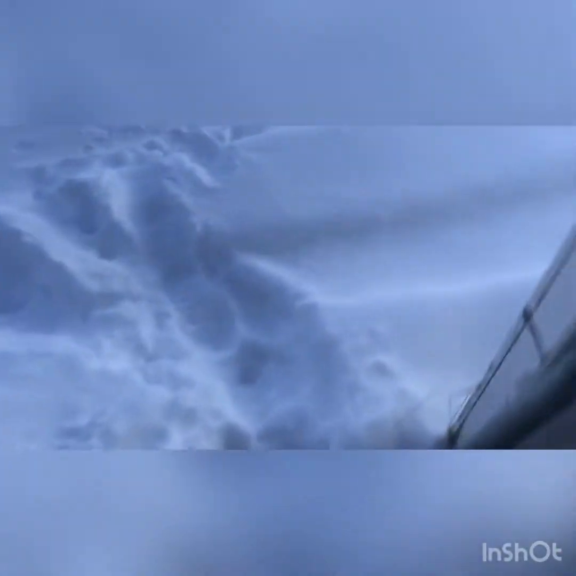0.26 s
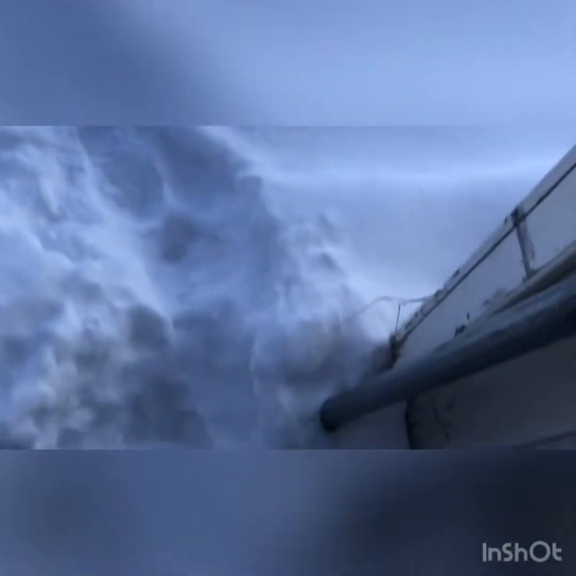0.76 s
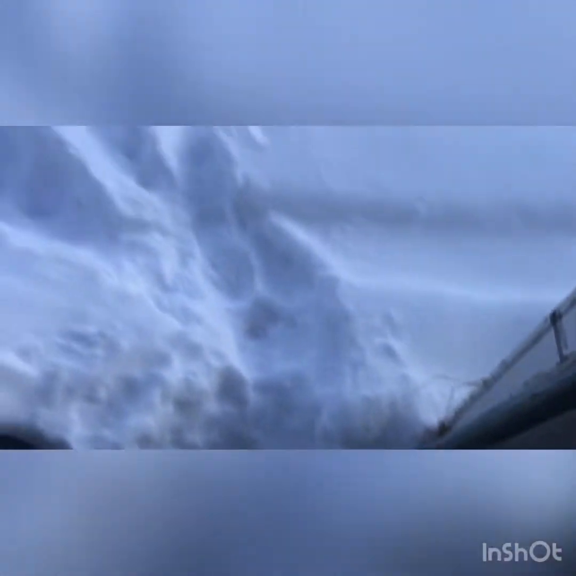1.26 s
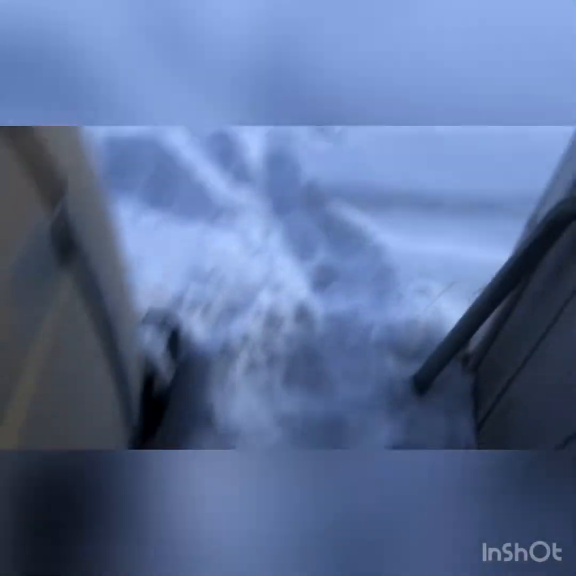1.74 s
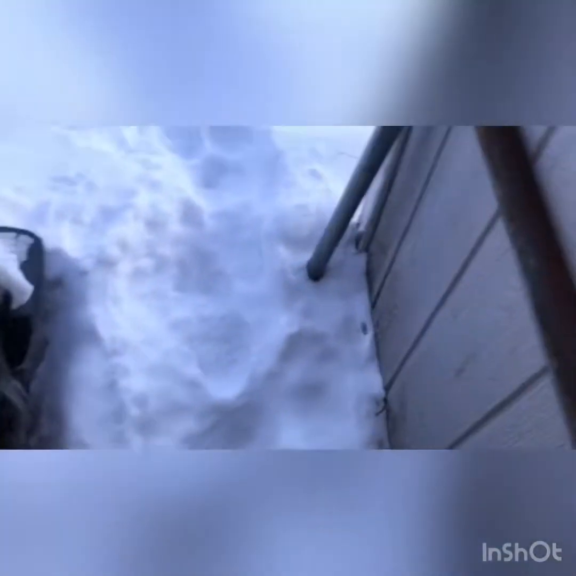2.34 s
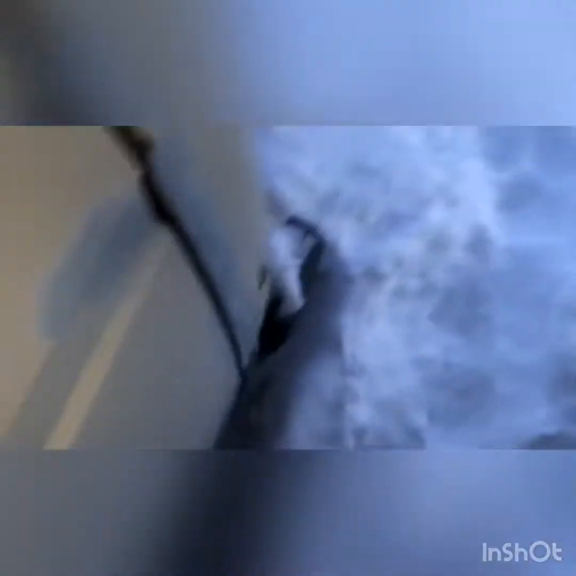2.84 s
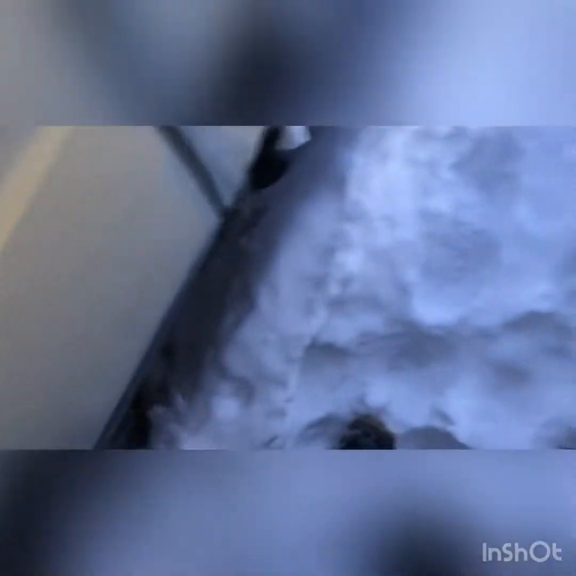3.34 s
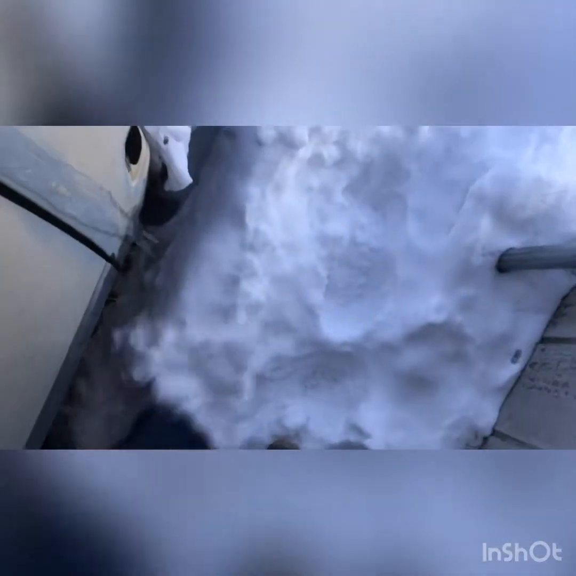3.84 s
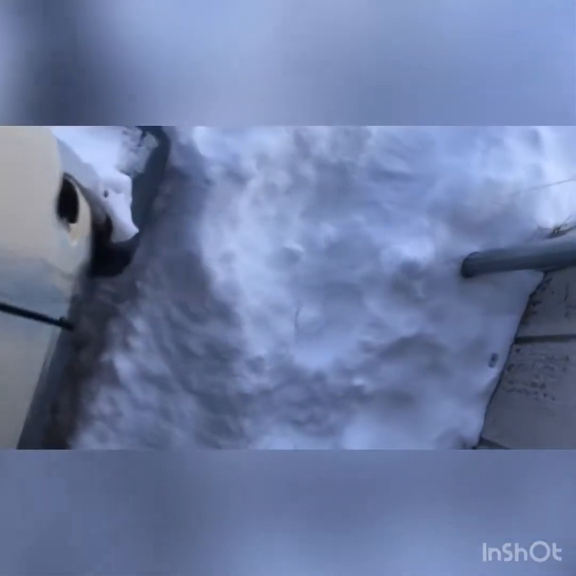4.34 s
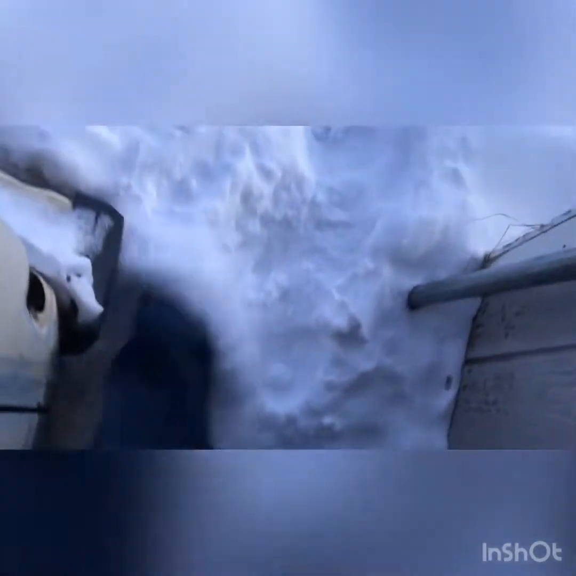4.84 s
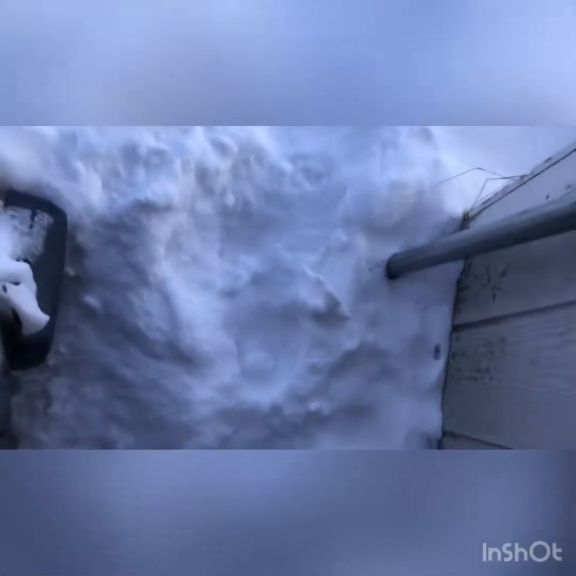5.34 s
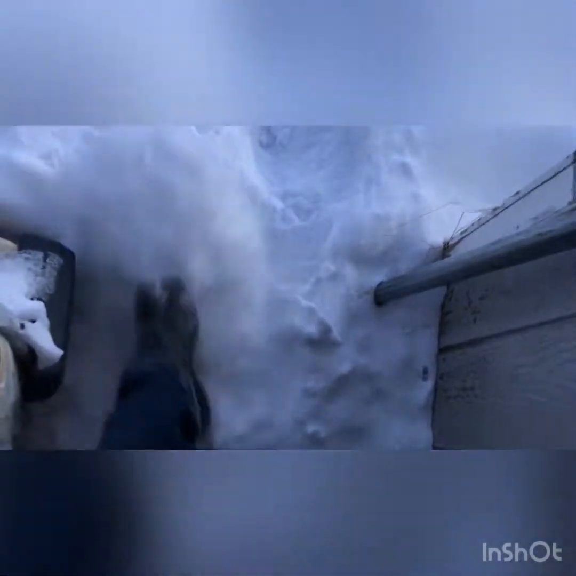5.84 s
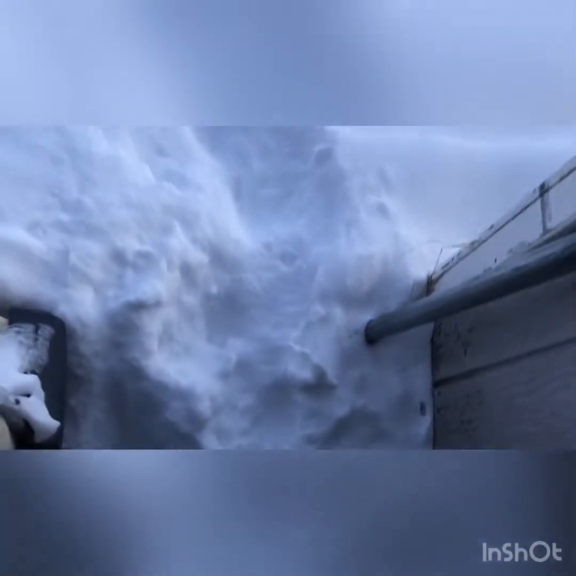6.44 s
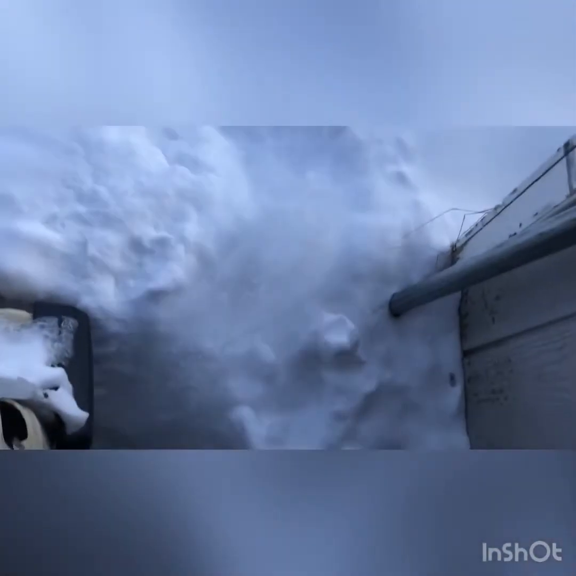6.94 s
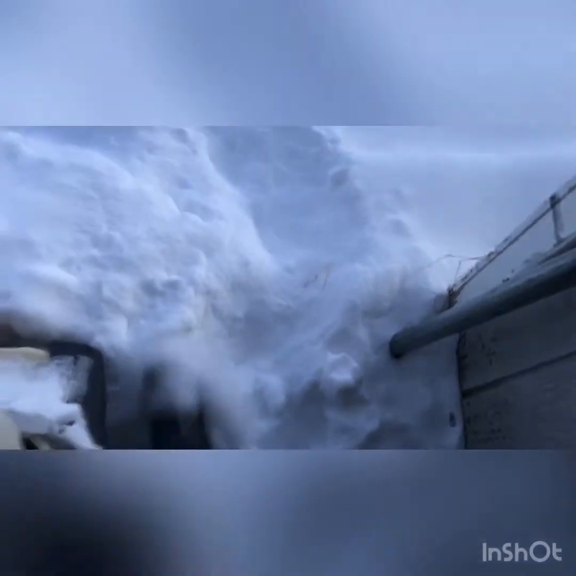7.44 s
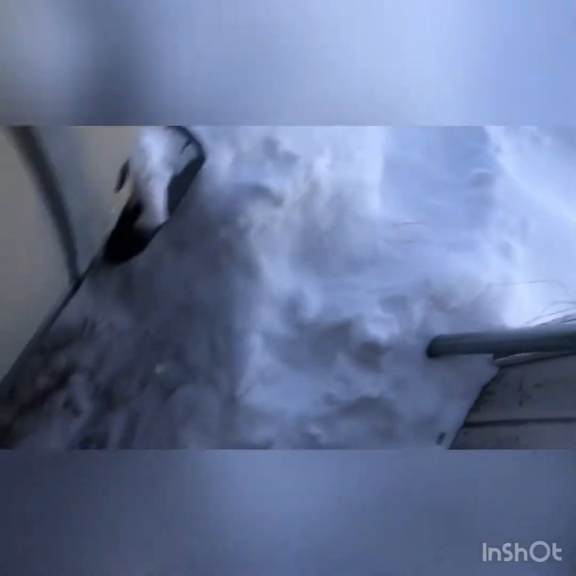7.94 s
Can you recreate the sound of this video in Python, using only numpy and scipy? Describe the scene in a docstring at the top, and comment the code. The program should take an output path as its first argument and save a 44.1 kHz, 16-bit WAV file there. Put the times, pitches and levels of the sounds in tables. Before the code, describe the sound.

Someone shuffles and kicks through crusty snow beside a parked van, with crunches, soft thuds, swishing powder and one hard clack.

```python
"""Someone shuffles and kicks through cold snow beside a parked van, phone in hand.
Swish, crumbs and shuffle swell with each leg sweep over a hush; a stick-slip rub stutters at once.
Then creaks, a tick and dispersed, falling cracks of crust; thuds follow, each leaving the drift settling.
From 1.25 s scuffs of hiss and grit, from 2 s short sagging tones; at 4.7 s a hard object clacks and rings."""
import sys
import numpy as np
from scipy import signal
from scipy.fft import rfft, irfft, next_fast_len
from scipy.io import wavfile
from scipy.ndimage import uniform_filter1d

SR = 44100
rng = np.random.default_rng(int(sys.argv[2]) if len(sys.argv) > 2 else 0)


def bounce(signal):
    """Save signal as a 16-bit WAV file at the path given by the first command-line argument."""
    frames = np.transpose(np.atleast_2d(signal))
    limited = np.clip(frames, -1, 1)
    pcm = np.round(limited * 32767).astype(np.int16)
    wavfile.write(sys.argv[1], SR, pcm)


N = 361179
TIME = np.arange(N) / SR
AFTER = TIME[:SR // 2]  # event clock; events are cut off at 0.5 s
LEAD_S = 256 / SR  # onset inside a chirp

# Spectral shapes, scaled to rms 1 in use: freq_hz, level_db (per Hz)
SWISH_SPECTRUM = [(880, -5), (1500, -3), (1810, -1), (2160, -3.5), (2600, -4.5), (3220, -2.5), (3730, -2.5),
                  (5200, -3), (9010, -4.5), (10800, -6.5), (14600, -7.5), (16000, -12.5)]
CRUMBLE_SPECTRUM = [(180, -11.5), (300, 1), (384, 1.5), (708, 1.5), (797, -3.5), (1110, -6), (1670, -12),
                    (2410, -18), (3430, -18.5), (5000, -23), (6500, -35.5), (11000, -120)]
SHUFFLE_SPECTRUM = [(15, -43), (25, -7.5), (60, 5.5), (81, 5), (118, 3), (156, 0), (227, 0.5), (289, -10),
                    (328, -29), (400, -9), (520, -54.5), (880, -120)]
THUD_SPECTRUM = [(25, -25), (42, -17), (70, 13), (110, -15.5), (180, 2), (280, -11.5), (600, -12.5),
                 (1200, -38), (3000, -111)]
HISS_SPECTRUM = [(1000, 8), (2200, 4), (3800, 7.5), (7000, 5), (10000, -2), (13000, -10), (16000, -22.5)]
GRIT_SPECTRUM = [(150, 1), (300, -6), (700, 3.5), (1200, -5), (1900, -12.5), (4000, -38)]
CLACK_SPECTRUM = [(200, -7.5), (1000, -20), (2600, -10), (3800, -8.5), (5500, -4.5), (7300, -2),
                  (8500, -11.5), (12000, -12.5), (16000, -21)]
BUMP_SPECTRUM = [(90, -5), (160, 5.5), (240, 0), (450, -3.5), (650, -8.5), (900, -21), (2000, -17)]
CRACKLE_SPECTRUM = [(800, 5.5), (1800, 2.5), (3500, -1.5), (6000, -7), (12000, -19)]
HUSH_SPECTRUM = [(60, -7), (600, -11), (3000, -24.5), (14000, -36)]
RASP_SPECTRUM = [(600, -5.5), (1100, 7), (1700, 11.5), (2900, 3), (4300, 5.5), (9000, -2), (15000, -18.5)]
BASS_SPECTRUM = [(60, -5), (110, 5.5), (205, 5), (320, -18)]
LOW_SPECTRUM = [(220, 3.5), (330, -3.5), (620, -4), (900, -23.5)]
MID_SPECTRUM = [(650, -10.5), (950, 9.5), (1600, 8), (2600, -4.5), (4000, -16)]
SPIT_SPECTRUM = [(2000, 0.5), (4200, -1.5), (6000, -2.5), (12000, -17)]
# Tick spectrum: freq_over_pitch, level_db
TICK_SPECTRUM = [(.25, -12), (0.74, -10), (1, 0), (0.94, -8), (2.6, -14)]

# Leg sweeps: peak_s, swish_db, crumbs_db, shuffle_db, rise_s, fall_s (20 dB each way)
LEG_SWEEPS = [(0.02, -52.5, -46, -52.5, 0.24, 0.1672), (0.24, -58.5, -52, -48, 0.34, 0.1873),
              (0.5, -70.5, -53, -57.5, 0.36, 0.46), (1.33, -60.5, -52.5, -46, 0.248, 0.4273),
              (1.609, -53, -48.5, -56.5, 0.07, 0.1058), (1.76, -56.0, -60.5, -67, 0.088, 0.0644),
              (2.06, -54.0, -51.5, -52.5, 0.222, 0.1628), (2.22, -56, -51.5, -45.5, 0.05, 0.09),
              (2.33, -57.0, -74, -68.5, 0.172, 0.24), (2.49, -53, -52.5, -55.5, 0.0666, 0.252),
              (2.67, -58, -49.0, -50, 0.174, 0.16), (3.21, -62, -63, -63.5, 0.058, 0.01),
              (3.75, -56.5, -60.5, -64, 0.2, 0.47), (4.01, -56, -55.5, -51, 0.175, 0.2174),
              (4.76, -47.5, -50, -46.5, 0.197, 0.1166), (5.521, -43.5, -52, -51.5, 0.1914, 0.14),
              (5.74, -56.5, -57.5, -60.5, 0.118, 0.03), (6.43, -48, -50, -58.5, 0.31, 0.2349),
              (7.281, -41.5, -59.0, -62, 0.224, 0.0791), (7.41, -51.5, -67, -68.5, 0.023, 0.033),
              (7.58, -66.5, -70.5, -71.5, 0.09, 0.77), (7.99, -55, -51.5, -57.5, 0.045, 0.08),
              (8.1, -55.5, -50, -60.5, 0.141, 0.3)]
# Slowly changing clothing rustle between the sweeps: time_s, level_db
CLOTHING_RUSTLE = [(0.3, -72.5), (0.6, -71.0), (0.95, -89.5), (1.4, -87), (3.0, -72.5), (3.5, -68.5),
                   (3.9, -61.5), (4.5, -60.5), (5.0, -65.5), (6.9, -61.5), (7.9, -66.5)]
# Stuttering rubs: start_s, end_s, first_gap_s, gap_ratio, first_db, last_db, bump_over_rasp_db
STICK_SLIP_RUBS = [(.003, 0.117, .0212, 1.0, -43.5, -40, 7.5), (0.15, .268, .0204, .952, -37, -37, 7),
                   (1.284, 1.46, .0148, 1.05, -53, -50.5, 8.5)]
# Snow creaking under a leaning foot: start_s, end_s, median_gap_s, mean_db, depth (0-1)
SOLE_CREAKS = [(0.371, .45, 0.0327, -43.5, 0.97), (4.985, 5.14, 0.0211, -46.5, 0.87),
               (5.755, 5.89, 0.0225, -47, 0.82), (5.949, 6.08, 0.01656, -49.5, 0.84),
               (6.253, 6.275, 0.0109, -43, 0.17), (6.53, 6.68, 0.0238, -44.5, 0.56),
               (6.804, 6.915, 0.01423, -41.5, 0.79)]
# Small hard ticks: start_s, level_db, pitch_hz
HARD_TICKS = [(.402, -38, 8320), (2.070, -28.5, 7900)]
# Crust breaks: start_s, snap_db, bass_db, spit_db, depth (0-1, deep is duller)
CRUST_CRACKS = [(0.481, -44, -53, -51, 0.66), (0.519, -34.5, -48, -48.5, 0.6),
                (.569, -42.5, -58.5, -53.5, 0.47), (0.671, -42, -47.5, -49.5, 0.26),
                (0.762, -36.5, -49, -54.5, 0.35), (0.92, -35.5, -42.5, -49, 0.43),
                (1.014, -44.5, -55.5, -55, .2), (1.084, -34, -55, -49, 0.18),
                (1.186, -32, -52, -43.5, 0.51), (1.216, -33.5, -41.5, -44.5, 0.81),
                (1.242, -37, -49.5, -48.5, 0.58), (1.255, -36.5, -28.5, -44, 0.62),
                (1.33, -38, -48, -57, 0.36), (1.387, -37, -47.5, -54, 0.47),
                (1.471, -38.5, -44.5, -46.5, .5), (1.503, -40, -42, -48, 0.36),
                (1.554, -45, -59, -51, 0.41), (1.616, -34.5, -42, -46.5, 0.8),
                (1.71, -36.5, -53.5, -62.5, 0.44), (1.805, -34.5, -62.5, -61.5, 0.71),
                (1.874, -40, -50.5, -65, 0.76), (1.926, -32.5, -46, -48, 0.59),
                (1.947, -34.5, -46.5, -48, 0.63), (2.013, -39, -56.5, -56.5, 0.38),
                (2.136, -33, -31, -54, 0.6), (2.199, -38, -42.5, -47.5, 0.31),
                (2.219, -38.5, -42, -48.5, 0.67), (2.569, -34.5, -48, -56, 0.69),
                (2.602, -33.5, -40, -44, 0.68), (2.648, -34, -45.5, -45, .55),
                (2.683, -34.5, -41, -47, 0.41), (2.707, -38.5, -46.5, -55.5, 0.56),
                (2.732, -36, -45, -47, 0.4), (2.755, -34.5, -48.5, -46, 0.45),
                (2.778, -35.5, -44, -45, 0.48), (2.819, -39, -49.5, -52, 0),
                (3.109, -36, -61.5, -55.5, 0.6), (3.173, -29.5, -52.5, -48, 0.63),
                (3.209, -35.5, -38, -49.5, 0.33), (3.301, -38, -54, -48, 0.78),
                (3.47, -35, -50, -49.5, 1.0), (3.572, -27, -42.5, -34.5, 0.42),
                (3.597, -36, -31, -54, 0.52), (3.619, -21.5, -30, -33.5, 0.45),
                (3.923, -36.5, -63.5, -55, 0.0), (4.106, -32, -62, -53.5, 0.58),
                (4.366, -28.5, -26, -62, 0.62), (4.603, -37, -61, -52.5, 0),
                (4.626, -34.5, -56.5, -44, 0.24), (4.648, -33.5, -63, -48.5, 0.06),
                (4.677, -35.5, -54, -41, 0.18), (5.116, -40, -50.5, -51, 0.47),
                (5.155, -39.5, -49, -58.5, 0.74), (5.187, -35, -42, -50.5, 0.7),
                (5.258, -26, -23.5, -45, 0.27), (5.322, -36.5, -54, -46, 0.46),
                (5.529, -29, -38, -41, 0.53), (5.549, -24, -32.5, -35, 0.45),
                (5.788, -37.5, -44.5, -50, 0.78), (5.835, -42.5, -48.5, -52.5, 0.77),
                (5.905, -40, -38, -49.5, 0.77), (5.981, -41.5, -40.5, -51.5, 0.83),
                (6.02, -34.5, -41.5, -48.5, 0.85), (6.133, -44.5, -37, -55, 0.57),
                (6.28, -39.5, -51, -46.5, 0.31), (6.299, -35.5, -55.5, -43, 0.05),
                (6.306, -26.5, -32, -39.5, 0.16), (6.326, -34, -46.5, -45.5, 0.18),
                (6.359, -28.5, -44.5, -40, 0.19), (6.371, -33, -45, -37, 0.47),
                (6.379, -30.5, -38, -42.5, 0.72), (6.387, -33.5, -35.5, -51, 0.69),
                (6.476, -37, -55, -41.5, 0.17), (6.546, -36, -51, -49, 0.36),
                (6.562, -37, -53.5, -52.5, 0.57), (6.632, -36.5, -55.5, -49, 0.39),
                (6.692, -33, -68, -43, 0.72), (6.875, -37, -43, -51.5, 0.64),
                (6.927, -34.5, -41, -40, 0.52), (6.976, -31.5, -28, -41, 0.39),
                (7.05, -38, -43, -41.5, 0.03), (7.199, -27.5, -18, -35, 0.12),
                (7.862, -40, -54.5, -55.5, 0.12), (8.074, -25.5, -52.5, -43, 0.82),
                (8.146, -29, -40, -37, 0.64)]
# Modes of a freed slab: freq_over_pitch, level_db
SLAB_RESONANCES = [(.3, 1), (.5, -1.5), (1, -2.5), (1.6, -2.5), (2.8, -2)]
# Weight landing on deep snow: start_s, level_db, t60_s, pitch_hz
BOOT_THUDS = [(.802, -37, 0.266, 200.5), (.92, -38.5, 0.39, 171.9), (1.0, -37, 0.116, 159.7),
              (1.259, -30, 0.286, 85.6), (1.297, -39.5, 0.23, 202.4), (1.425, -42, 0.39, 170.7),
              (2.072, -32, 0.35, 52.3), (2.366, -40.5, 0.556, 78.6), (3.214, -36, 0.145, 129.8),
              (3.359, -32, 0.168, 119.2), (3.604, -31, 0.406, 103.8), (3.955, -33, 0.178, 136.5),
              (4.403, -35, .36, 113.6), (4.795, -37.5, .24, 127.2), (5.274, -33.5, 0.383, 116.2),
              (5.553, -31, 0.116, 200.2), (6.15, -36.5, 0.108, 103.7), (6.984, -37, 0.193, 113.2),
              (7.206, -30.5, 0.169, 194), (7.698, -24.5, 0.179, 98.5), (7.76, -40, 0.41, 89.9),
              (8.087, -23.5, 0.0883, 75)]
# Boot dragged through crust: start_s, length_s, hiss_db, grit_db, swell_db, grit_pitch_hz
BOOT_SCUFFS = [(1.25, .25, -61, -58, 0, 600), (2.067, 0.0777, -46, -47, 2, 620),
               (2.193, 0.0594, -56.5, -58.5, -4.5, 500), (2.465, .09, -56, -56, -2, 600),
               (2.609, 0.0677, -48, -45.5, 4, 780), (3.346, 0.0217, -57, -51.5, -1, 700),
               (3.536, 0.0242, -57.5, -52.5, -1.5, 900), (3.616, 0.038, -41.5, -54, -1.5, 800),
               (6.13, 0.00783, -40, -57.5, -0.5, 900), (6.141, .019, -48.5, -67.5, -1, 900),
               (6.368, 0.014, -47.5, -41, 0, 620), (6.412, .068, -50.5, -44.5, 2, 930),
               (7.198, 0.0039, -34.5, -38, 0.5, 700), (7.247, 0.0629, -39, -38, 0, 866),
               (7.405, .03, -61, -75, 0, 800), (7.686, 0.0584, -79.5, -44, -11.5, 560),
               (8.078, 0.0314, -53.5, -40, -1, 683), (8.113, 0.0297, -69.5, -48, -1.5, 796),
               (8.144, 0.046, -50, -38.5, 0.5, 730)]
# Short sagging tones, brief squeaks and the ringing of cracks: start_s, level_db, pitch_hz (at the crest)
SAGGING_TONES = [(2.014, -37, 1300), (3.175, -35, 1156), (4.649, -35, 1523), (5.262, -25, 713),
                 (5.552, -24.5, 430.5), (6.307, -31, 2050), (6.332, -32, 920), (6.363, -25.5, 654),
                 (7.229, -28, 924), (7.239, -21, 1090), (7.252, -20.5, 1114), (7.255, -26, 692),
                 (8.075, -14.5, 769), (8.149, -28.5, 780), (8.164, -27, 835), (8.169, -30.5, 800),
                 (8.174, -26, 826)]
# Ring of the hard object: freq_hz, relative_level_db, t60_s
CLACK_RING = [(1622, -29.5, .09), (3308, -34, .07), (3516, -31, .07), (3812, -23, .06), (3895, -27, .07),
              (4026, -32, .07), (4460, -32, .07), (4768, -31, .06), (4930, -30, .07), (5228, -29, .05),
              (5590, -31, .05), (5877, -25, .035), (6188, -33, .06), (6464, -28, .04), (7094, -21, .04),
              (7273, -26, .04), (7662, -27, .04), (8600, -32, .04)]
# Reflections off the van and the wall: delay_s, level_db
FIRST_REFLECTIONS = [(.0034, -25), (.0066, -22), (0.0124, -20.5)]

SWEEP_SHAPE = 1.373  # 1 pointed crest, 2 round
CRUMBLE_REST_DB, SHUFFLE_REST_DB = -62, -55.5  # feet never quite still
SETTLE_T60_S = 0.873  # the drift keeps shifting after a thud
SETTLE_CRUMBLE_DB, SETTLE_SHUFFLE_DB = -22, -13  # relative to the thud
CRACKLE_DB, CRACKLE_PER_S = -6.5, 220  # crystals snapping; level relative to the crumbs
SLIP_SCATTER_DB, SLIP_S = 1.2, .0019  # unevenness; half length
SLIP_SPREAD = 0.1527  # log spread of slip length and bump lag
LAG_S, SLAB_LAG_S = 0.002994, 0.003025  # dispersion scale; a heavy slab adds to it
MID_DB, LOW_DB = -6.5, -4  # parts of a snap
DEPTH_TILT_DB = 20.5  # per unit depth: cut of one part; the other rises half as much
SLAB_HZ, SLAB_SCATTER, SLAB_Q, SLAB_DRY_DB = 1408.5, 0.1753, 7.64, -7.5
JERK_PER_S, JERK_DB = 220, 2  # a dragged sole advances in jerks
GRIT_HZ = 718  # grit pitch that leaves its spectrum unshifted
CLACK_S, RING_DB = 4.7083, 3.5
TOP_HZ = 15900


def undb(db):
    """Decibels to gain."""
    return 10 ** (np.asarray(db) / 20)


def unit(x):
    """Scale to rms 1."""
    return x / np.sqrt(np.mean(x ** 2))


def add(out, start_s, x):
    """Mix x into out from start_s."""
    i = int(start_s * SR)
    x, i = x[max(0, -i):], max(0, i)
    out[i:i + len(x)] += x[:max(0, len(out) - i)]


def fade(t60_s):
    """Exponential decay, 60 dB in t60_s."""
    return np.exp(-np.log(1000) * AFTER / max(t60_s, 1e-4))


def noise(size=N):
    """White noise."""
    return rng.standard_normal(size)


def colour(x, points):
    """Give x a spectrum, falling 38.4 dB per octave beyond its ends; rms 1."""
    hz, db = np.transpose(points)
    size = next_fast_len(len(x))
    octave = np.log2(np.maximum(np.fft.rfftfreq(size, 1 / SR), 1))
    beyond = np.abs(octave - np.clip(octave, np.log2(hz[0]), np.log2(hz[-1])))
    gain = undb(np.interp(octave, np.log2(hz), db) - 38.4 * beyond)
    return unit(irfft(rfft(x, size) * gain, size)[:len(x)])


def walk(knots_per_s, size=N):
    """Random wander along straight lines between knots, spread near 1."""
    knots = noise(size // 50)
    return 1.365 * np.interp(TIME[:size] * knots_per_s, np.arange(len(knots)), knots)


def grains(per_s, spread_db):
    """Random clicks, mostly small and a few large."""
    chance, size, sign = rng.random(N), rng.exponential(size=N), rng.choice([-1, 1], N)
    return (chance < per_s / SR) * sign * undb(spread_db * np.minimum(size, 4))


def lumpy(x, knots_per_s, depth_db):
    """Lumps of different sizes give way in turn: each half octave swells alone, higher ones mostly faster."""
    size = next_fast_len(N)
    spectrum = rfft(x, size)
    octave = np.log2(np.maximum(np.fft.rfftfreq(size, 1 / SR), 1) / 500)
    out = np.zeros(N)
    for centre in np.arange(-4.5, 5, .5):
        band = irfft(spectrum * np.maximum(1 - 2 * np.abs(octave - centre), 0), size)[:N]
        out += band * undb(depth_db * walk(knots_per_s * 2 ** min(centre, 2)))
    return out


def disperse(x, lag_s):
    """Bending waves in a crust, lows last: delay is lag_s * (sqrt(1000 / Hz) - sqrt(1 / 3))."""
    size = next_fast_len(len(x))
    hz = np.fft.rfftfreq(size, 1 / SR)
    cycles = lag_s * (2 * np.sqrt(1000 * hz) - hz * np.sqrt(1000 / 3000))
    return irfft(rfft(x, size) * np.exp(-2j * np.pi * cycles), size)[:len(x)]


def chirp(points, lag_s):
    """One dispersed snap with peak 1; its impulse sits LEAD_S in."""
    snap = disperse(colour(signal.unit_impulse(4096, 256), points), lag_s)
    return snap / np.abs(snap).max()


def slab(x, pitch_hz):
    """Let a piece of crust ring with x; the energy stays the same."""
    f = np.maximum(np.fft.rfftfreq(len(x), 1 / SR), 1)
    response = undb(SLAB_DRY_DB)
    for multiple, db in SLAB_RESONANCES:
        mode_hz = pitch_hz * multiple
        response = response + undb(db) / (1 + 1j * SLAB_Q * (f / mode_hz - mode_hz / f))
    return unit(irfft(rfft(x) * response, len(x))) * np.sqrt(np.mean(x ** 2))


def crack(snap_db, bass_db, spit_db, depth):
    """One break: a spit of crystals and a chirp that falls into the bass, coloured by the slab it frees."""
    pitch_hz = SLAB_HZ * np.exp(SLAB_SCATTER * rng.standard_normal())
    lag_s = LAG_S + SLAB_LAG_S / (1 + undb(snap_db - bass_db) ** 2)
    tilt_db = DEPTH_TILT_DB * (depth - .5)
    low_db = snap_db + LOW_DB + min(tilt_db, tilt_db / 2)
    mid_db = snap_db + MID_DB - max(tilt_db, tilt_db / 2)
    bass = chirp(BASS_SPECTRUM, lag_s)
    snap = undb(low_db) * chirp(LOW_SPECTRUM, lag_s) + undb(mid_db) * chirp(MID_SPECTRUM, lag_s)
    size = len(snap)
    spit = np.zeros(size)
    add(spit, LEAD_S, fade(0.02023)[:size] * colour(noise(size), SPIT_SPECTRUM))
    return undb(bass_db) * bass + slab(snap, pitch_hz) + undb(spit_db) * slab(spit, pitch_hz)


def effort():
    """Levels of swish, crumbs, shuffle and crackle: sweeps swell and die, thuds leave the drift settling."""
    cloth, crumbs, feet, settling = np.zeros((4, N))  # powers
    for peak_s, swish_db, crumbs_db, shuffle_db, rise_s, fall_s in LEG_SWEEPS:
        away = np.minimum(np.maximum((peak_s - TIME) / rise_s, (TIME - peak_s) / fall_s), 4)
        swell = undb(-20 * away ** SWEEP_SHAPE) ** 2
        cloth += undb(swish_db) ** 2 * swell
        crumbs += undb(crumbs_db) ** 2 * swell
        feet += undb(shuffle_db) ** 2 * swell
    for start_s, db, t60_s, _ in BOOT_THUDS:
        add(settling, start_s, (undb(db) * fade(SETTLE_T60_S)) ** 2 * min(t60_s / 0.278, 1))
    swish = cloth + undb(np.interp(TIME, *np.transpose(CLOTHING_RUSTLE))) ** 2
    crumble = crumbs + undb(SETTLE_CRUMBLE_DB) ** 2 * settling + undb(CRUMBLE_REST_DB) ** 2
    shuffle = feet + undb(SETTLE_SHUFFLE_DB) ** 2 * settling + undb(SHUFFLE_REST_DB) ** 2
    return np.sqrt([swish, crumble, shuffle, crumbs])


def swish(level):
    """Cloth and loose powder: dense grains, fluttering in level."""
    return colour(lumpy(grains(9000, 2.2), 12, 1.3956), SWISH_SPECTRUM) * level * undb(1.346 * walk(70))


def crumble(level):
    """Crumbs of snow patter: dispersed sparse grains over equally strong noise."""
    patter = unit(disperse(grains(260, 2.62), 0.0036047)) + noise()
    return colour(lumpy(patter, 45, 4), CRUMBLE_SPECTRUM) * level


def crackle(level, count=14):
    """Small lumps snap one by one, each pinging for a few cycles in one of several pitches."""
    pings = np.zeros(N)
    for hz in np.geomspace(800, 7000, count):
        pings += signal.lfilter(*signal.iirpeak(hz, 3.5, fs=SR), grains(CRACKLE_PER_S / count, 2.43))
    return colour(pings, CRACKLE_SPECTRUM) * undb(CRACKLE_DB) * level


def shuffle(level):
    """Feet shift in the drift: low lumpy noise, slowly wavering."""
    return colour(lumpy(noise(), 90, 3), SHUFFLE_SPECTRUM) * level * undb(1.98 * walk(25))


def hush():
    """Steady dull noise of the yard."""
    return undb(-65.5) * colour(noise(), HUSH_SPECTRUM)


def movement():
    """The beds that follow the legs, over the hush."""
    swish_level, crumble_level, shuffle_level, crumbs_level = effort()
    crackle_level = np.minimum(crumbs_level, swish_level * undb(9))
    beds = swish(swish_level) + crumble(crumble_level) + crackle(crackle_level)
    return beds + shuffle(shuffle_level) + hush()


def stutter(count=12):
    """Stick and slip, some 45 to 70 a second: each slip is a short rasp, then a low bump."""
    rasp_level, bumps = np.zeros(N), np.zeros(N)
    for start_s, end_s, gap_s, ratio, first_db, last_db, bump_db in STICK_SLIP_RUBS:
        s = start_s
        for k, (early, hard, long, soft) in enumerate(noise((count, 4))):
            if s < end_s:
                db = np.interp(s, [start_s, end_s], [first_db, last_db]) + SLIP_SCATTER_DB * hard
                slip_s, half_s = s + 0.000593 * early, SLIP_S * np.exp(SLIP_SPREAD * long)
                add(rasp_level, slip_s - .01, undb(db) * np.exp(-.5 * ((AFTER - .01) / half_s) ** 2))
                bump = chirp(BUMP_SPECTRUM, .0055 * np.exp(SLIP_SPREAD * soft))
                bump = slab(bump, 420 * np.exp(SLAB_SCATTER * long))
                add(bumps, slip_s - LEAD_S, undb(db + bump_db) * bump)
            s += gap_s * ratio ** k
    return rasp_level * colour(lumpy(noise(), 40, 3), RASP_SPECTRUM) + bumps


def creaks(count=14, bass_db=-6, spit_db=-11):
    """The sole settles in small uneven jerks, each a tiny crack."""
    out = np.zeros(N)
    for s, end_s, gap_s, mean_db, depth in SOLE_CREAKS:
        for late, hard in noise((count, 2)):
            db = mean_db + 2.1 * hard
            add(out, s - LEAD_S, (s < end_s) * crack(db, db + bass_db, db + spit_db, depth))
            s += gap_s * np.exp(.28 * late)
    return out


def ticks():
    """Small hard contacts: very brief noise peaking at a pitch."""
    out = np.zeros(N)
    for start_s, db, pitch_hz in HARD_TICKS:
        points = [(ratio * pitch_hz, level_db) for ratio, level_db in TICK_SPECTRUM]
        add(out, start_s, undb(db) * fade(0.0105) * colour(noise(len(AFTER)), points))
    return out


def cracks():
    """The clear breaks of the crust."""
    out = np.zeros(N)
    for start_s, *row in CRUST_CRACKS:
        add(out, start_s - LEAD_S, crack(*row))
    return out


def thuds():
    """Snow collapses under a boot: a few heavy swings of the pack inside a dull, dying rumble."""
    weight, swings = np.zeros(N), np.zeros(N)
    for start_s, db, t60_s, pitch_hz in BOOT_THUDS:
        load = undb(db) * fade(t60_s) * (1 - np.exp(-AFTER / 0.00332))
        swing_hz = pitch_hz * (1 + 0.144 * walk(90, size=len(AFTER)))
        add(weight, start_s, load)
        add(swings, start_s, load * np.sin(2 * np.pi * np.cumsum(swing_hz) / SR))
    rumble = colour(noise(), THUD_SPECTRUM)
    rumble = rumble / np.sqrt(uniform_filter1d(rumble ** 2, size=1500))  # even level
    return undb(0.5) * swings + undb(-3.5) * weight * rumble


def scuffs():
    """A dragged sole jerks along, shearing crystals (hiss) and crushing lumps (grit), then stops short."""
    hiss_level, grit = np.zeros(N), np.zeros(N)
    chunks = lumpy(disperse(grains(2000, 0.89), 0.002956), 60, 3)
    jerks = unit(undb(JERK_DB * walk(JERK_PER_S)))
    for start_s, length_s, hiss_db, grit_db, swell_db, pitch_hz in BOOT_SCUFFS:
        contact = np.clip(AFTER / 0.00108, 0, 1) * np.exp(-np.maximum(AFTER - length_s, 0) / 0.00375)
        contact = contact * undb(swell_db * (np.minimum(AFTER / length_s, 1) - .5))
        lumps = np.roll(chunks, rng.integers(N))[:len(AFTER)]
        points = [(hz * pitch_hz / GRIT_HZ, db) for hz, db in GRIT_SPECTRUM]
        add(hiss_level, start_s, undb(hiss_db) * contact)
        add(grit, start_s, undb(grit_db) * contact * colour(lumps, points))
    return jerks * (grit + hiss_level * colour(grains(9000, 1.6), HISS_SPECTRUM))


def sagging_tones():
    """Brief squeaks and the ringing of cracks: a few sine cycles that sag in pitch."""
    out = np.zeros(N)
    for start_s, db, pitch_hz in SAGGING_TONES:
        age = AFTER * pitch_hz / 1.104  # 1 at the crest
        sagging_hz = pitch_hz * (0.6605 + 0.568 * np.exp(-age / 2))
        swell = (age * np.exp(1 - age)) ** 2
        add(out, start_s - .001, undb(db) * swell * np.sin(2 * np.pi * np.cumsum(sagging_hz) / SR))
    return out


def clack():
    """A hard contact: bright noise crack with a faint tail, and a short ring of decaying modes."""
    decay = undb(-13.5) * fade(0.0085) + undb(-13) * fade(0.0459) + undb(-44.5) * fade(0.288)
    burst = colour(noise(len(AFTER)), CLACK_SPECTRUM) * decay
    ring = np.zeros(len(AFTER))
    for hz, db, t60_s in CLACK_RING:
        ring += undb(db) * fade(t60_s) * np.sin(2 * np.pi * hz * AFTER + rng.uniform(0, 2 * np.pi))
    out = np.zeros(N)
    add(out, CLACK_S, np.minimum(AFTER / 0.00085, 1) * (burst + undb(RING_DB) * ring))
    return out


def scene():
    """Snow soaks up all but the first reflections; ticks and clack are mixed in without reflections."""
    ground = movement() + stutter() + creaks() + cracks() + thuds() + scuffs() + sagging_tones()
    out = ground + ticks() + clack()
    for delay_s, db in FIRST_REFLECTIONS:
        add(out, delay_s, undb(db) * ground)
    return out[None]


def record(dry):
    """The phone cuts the deepest rumble, clips at full scale and cuts the top."""
    x = signal.sosfilt(signal.butter(4, 33, "high", fs=SR, output="sos"), dry)
    return signal.sosfilt(signal.ellip(8, .2, 70, TOP_HZ, fs=SR, output="sos"), np.clip(x, -1, 1))


dry = scene()
out = record(dry)
bounce(out)
```